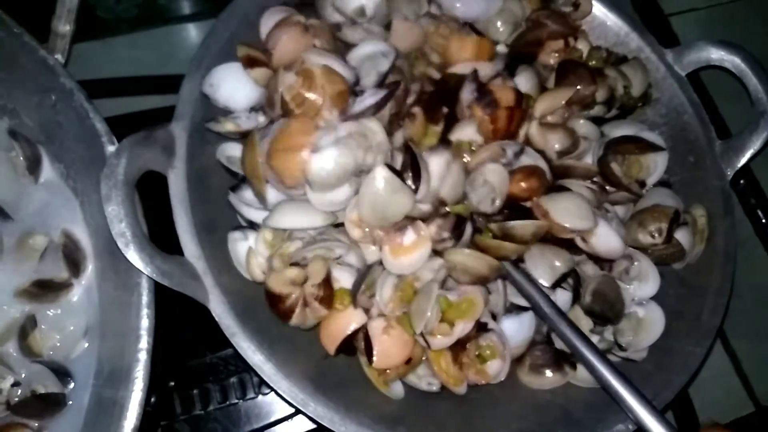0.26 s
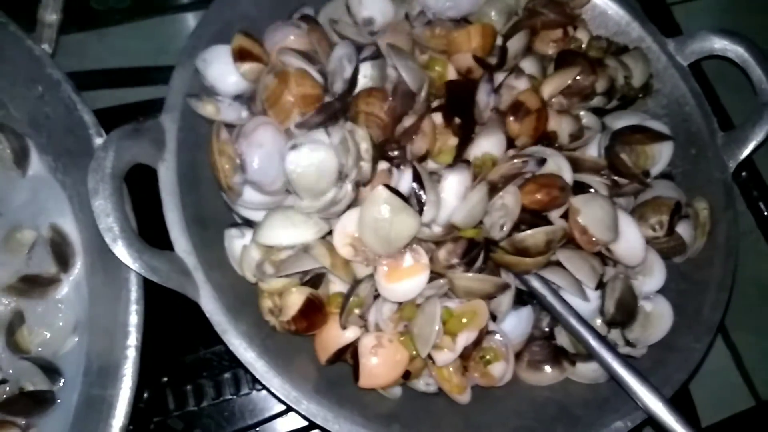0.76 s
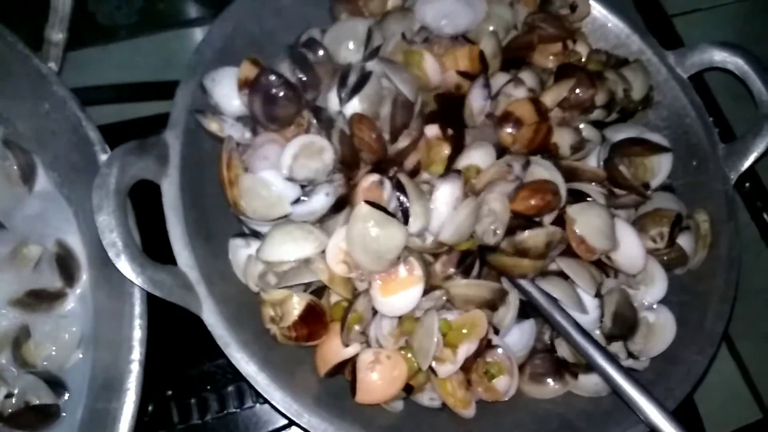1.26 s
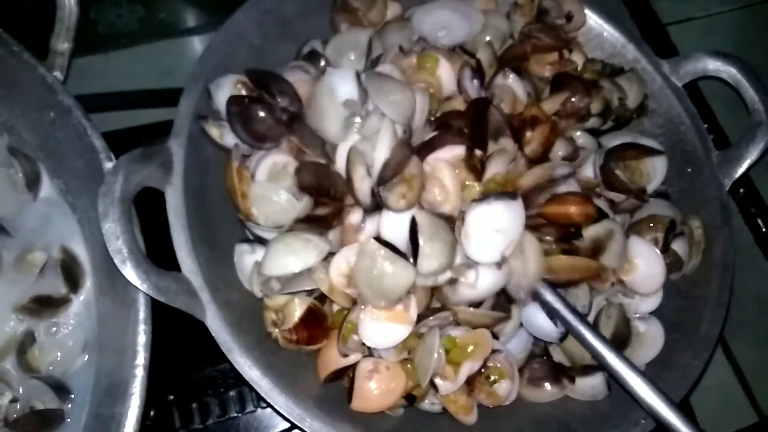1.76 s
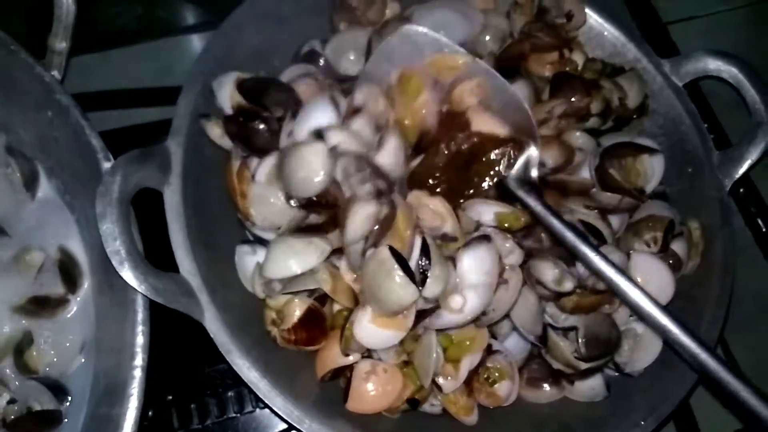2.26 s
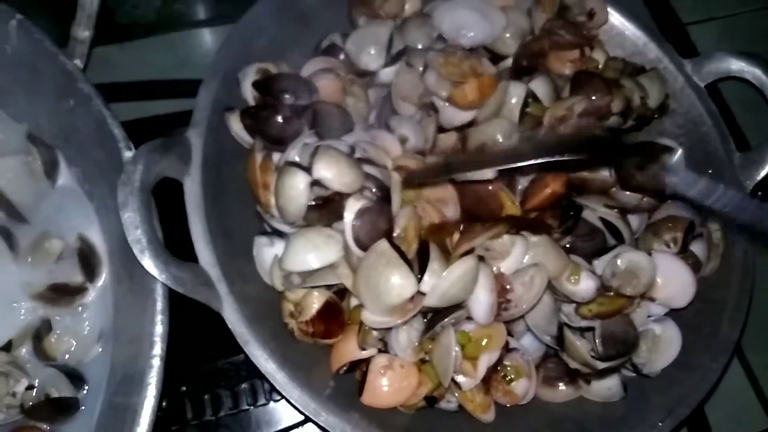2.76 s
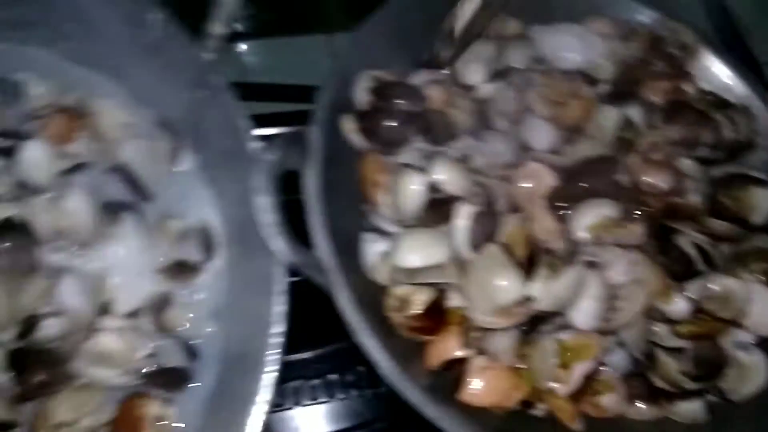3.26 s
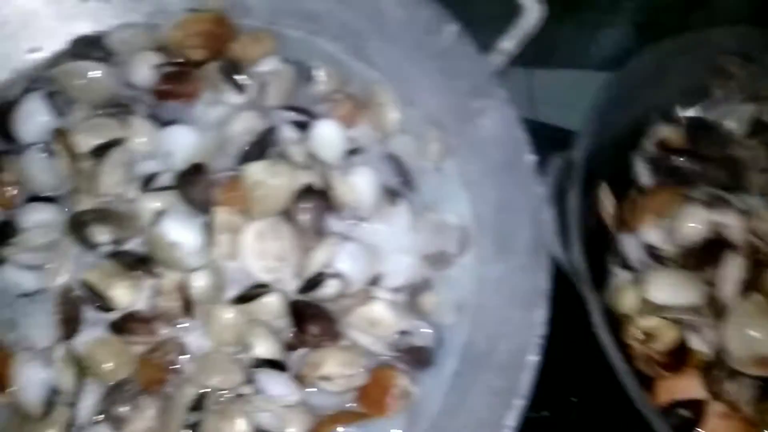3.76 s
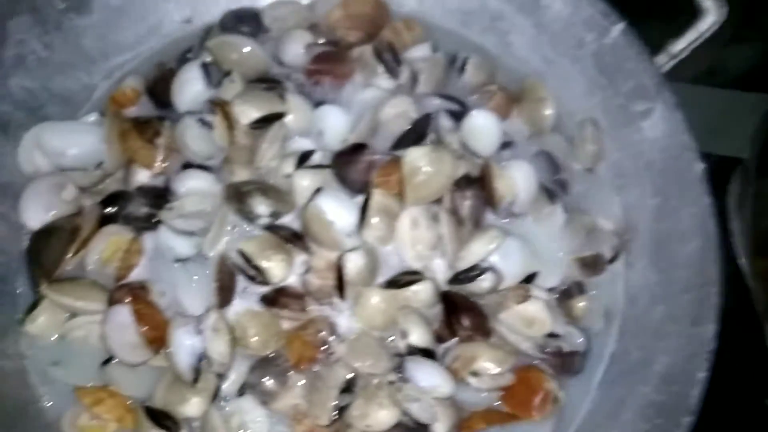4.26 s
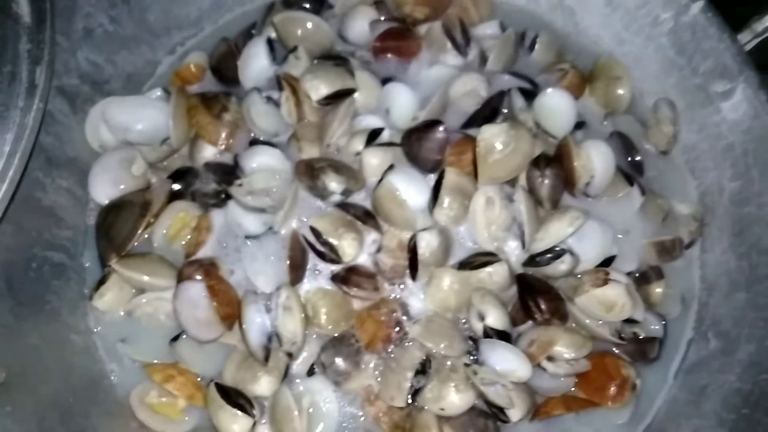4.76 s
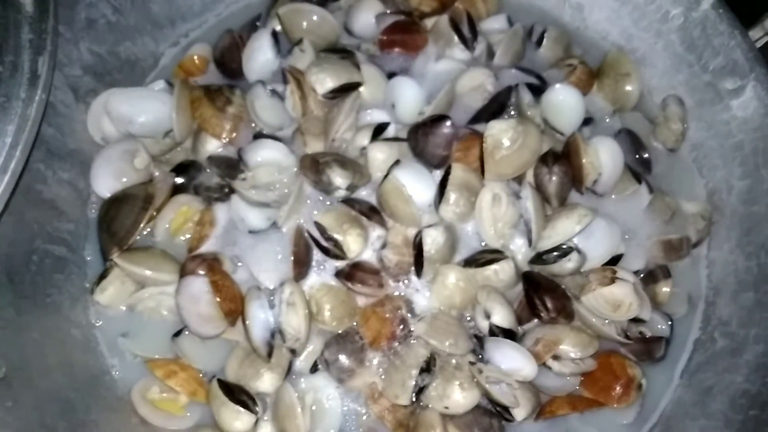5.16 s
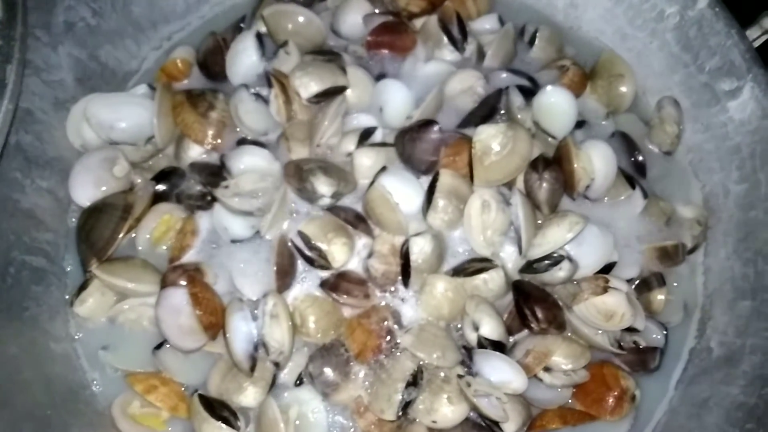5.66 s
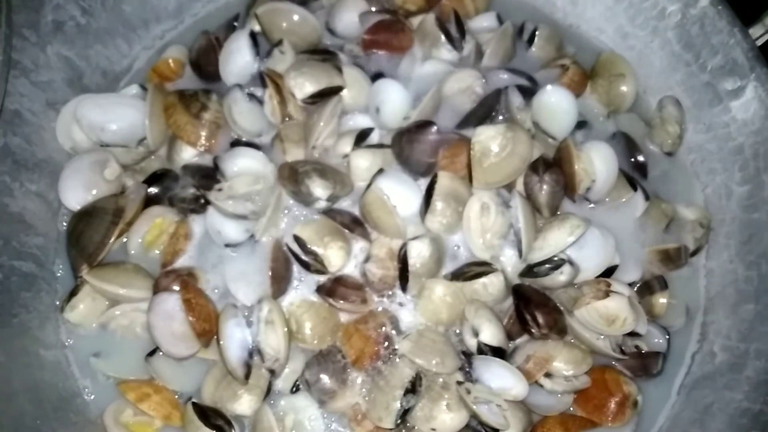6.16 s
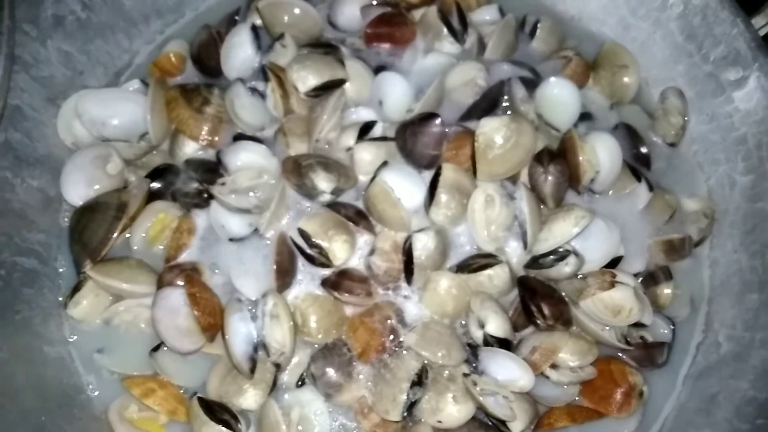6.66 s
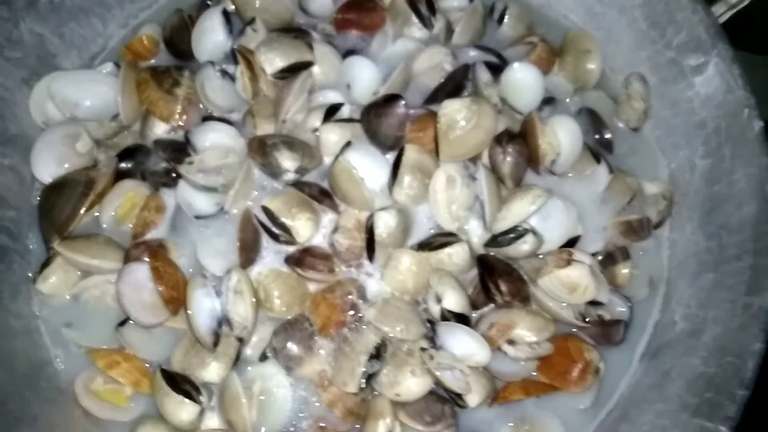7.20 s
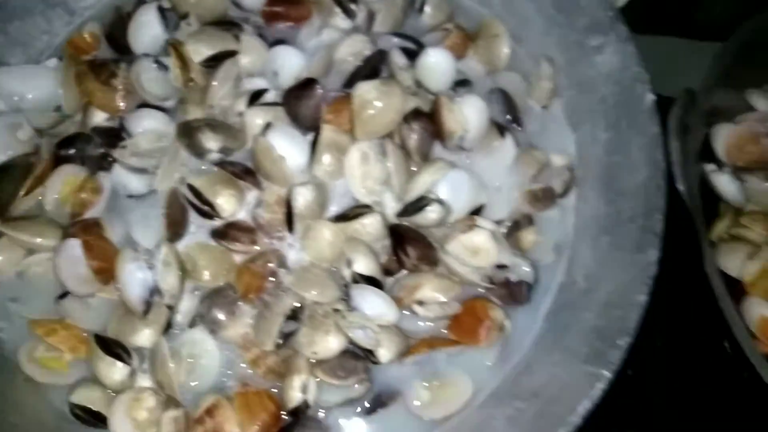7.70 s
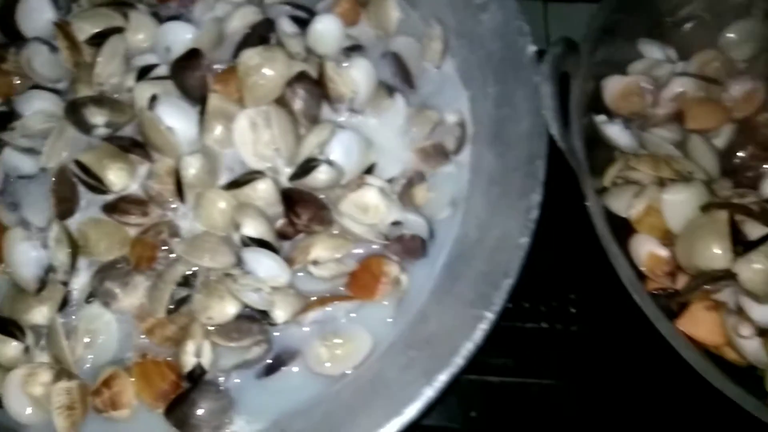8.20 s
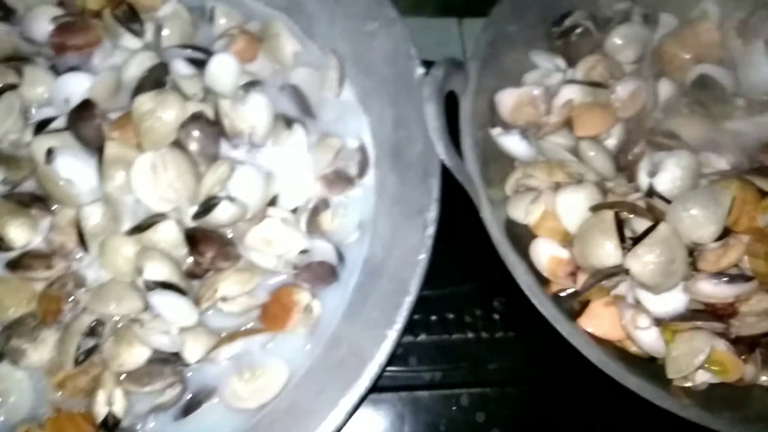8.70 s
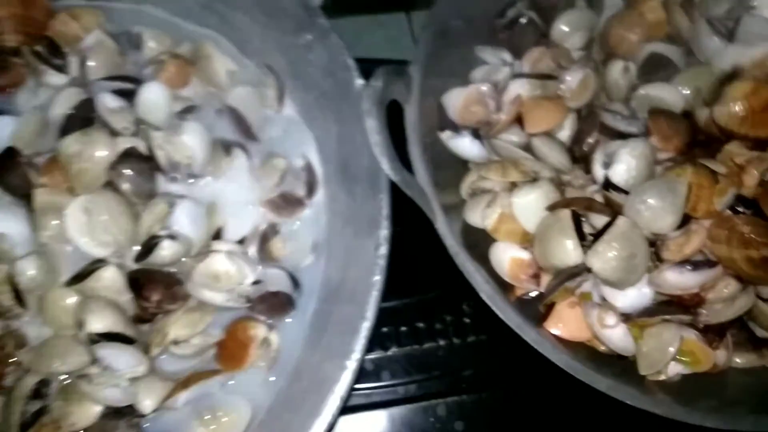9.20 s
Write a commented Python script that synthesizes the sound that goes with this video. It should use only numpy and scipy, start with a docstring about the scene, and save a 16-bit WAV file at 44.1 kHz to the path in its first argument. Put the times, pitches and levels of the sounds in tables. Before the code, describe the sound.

A metal spatula stirs a heap of clams in bare metal pans, shells clattering and grinding over a low burner rumble and bubbling simmer.

```python
"""In a small kitchen, a steel spatula first turns clams in a cast wok: shells clack and grind, the blade scrapes.
From about 4 s it works in a pan of broth beside it, where the broth sloshes between about 5.5 and 7.3 s.
After about 8.3 s it is back in the wok, and near 9 s two faint steady tones fade.
Shells are noise cracks with ringing modes, pans are dying sine waves, and broth is soft noise with bubbles.
Filtered noise and bubbles make the gas burners and simmering pans heard underneath all the way through."""
import sys
import numpy as np
from scipy import signal
from scipy.fft import rfft, irfft, next_fast_len
from scipy.io import wavfile
from scipy.ndimage import uniform_filter1d, map_coordinates

SR = 44100
rng = np.random.default_rng(int(sys.argv[2]) if len(sys.argv) > 2 else 0)


def generate_wav(sig):
    """Save sig (samples, or channels by samples) to the path in sys.argv[1] as 16-bit PCM at SR."""
    pcm = np.round(np.clip(np.atleast_2d(sig).T, -1, 1) * 32767).astype(np.int16)
    wavfile.write(sys.argv[1], SR, pcm)


N = 416304

# Tone of shells moving against each other. Each row: frequency in Hz, relative level in dB.
SHELL_TONE = [(500, -16.5), (1500, -2.5), (2050, -8.5), (2700, -2.5), (3900, -1), (5500, -2.5), (8000, 0),
              (15500, -6.5)]
TICKS_PER_S, TICK_SPREAD_DB = 60, 6  # each tick is up to this much louder or softer
SLIPS_PER_S, SLIP_S = 75, 0.009  # SLIP_S: time for a slip to fade to about a third


def rattle(stir_db, blade_db):
    """The heap shifts: shells tick one by one, and their ridges catch and slip in short rasps."""
    ticks = np.zeros((2, N))
    for slot in np.arange(0, N / SR, 1 / TICKS_PER_S):
        s = slot + 2 * rng.random() / TICKS_PER_S
        add(ticks, s, amp(TICK_SPREAD_DB * rng.uniform(-1, 1)) * any_shell())
    touches = contacts(per_second=1500, size_db=1.0)
    ridges = levelled(scattered(touches, any_shell, size=1024), seconds=0.0093)
    # a slip starts at once and dies away
    slip_starts = np.abs(contacts(SLIPS_PER_S, size_db=2))
    slips = signal.lfilter([1], [1, -np.exp(-1 / (SLIP_S * SR))], slip_starts)
    # in a brisk stroke the slips merge into a continuous grind
    grind = .45 * amp(.5 * (stir_db + 35))
    rasps = unit(ridges * (slips + grind))
    heap = coloured(.5 * unit(ticks) + rasps, SHELL_TONE)
    # shells pressed against the metal sound fuller, loose ones thinner
    body = filtered(heap, lambda hz: hump(hz, 1700, octaves=1.0))
    pressed = heap + body * (amp(blade_db + 24.5) - 1)
    return amp(stir_db + 0.5) * levelled(pressed, seconds=0.083)


# Pushes of the spatula through the heap. Each row: start in seconds, length in seconds,
# basic rattle level in dB, swell from start to end in dB, scrape offset in dB.
STROKES = [(0.074, 0.44, -43, -3, -22), (0.905, 0.13, -43, 8.5, -24), (1.16, 0.44, -44.5, -8.5, -19.5),
           (1.888, 0.09, -35, 2, -27.5), (2.045, 0.091, -38.5, 8.5, -17.5), (2.215, 0.11, -33, -6.5, -23),
           (2.383, 0.27, -47, -14, -22), (2.861, 0.04, -36.5, 7, -24.5), (3.497, 0.18, -37, 11.5, -20),
           (3.739, 0.05, -27, 4.5, -21), (3.923, 0.3, -45.5, 16.5, -19.5), (4.266, 0.67, -32.5, 2.5, -28),
           (5.705, 0.061, -27.5, 6.5, -21.5), (5.801, 0.31, -36.5, -6, -19.5),
           (6.013, 0.068, -28.5, -4.5, -22.5), (6.366, 0.18, -46.5, -14, -29),
           (6.848, 0.29, -35, 13.5, -23), (7.465, 0.3, -37, 10, -23), (7.833, 0.25, -34.5, -8, -20),
           (8.206, 0.24, -45, -1.5, -21.5), (8.431, 0.3, -33.5, -6.5, -29)]
SETTLE_DB_PER_S = 234  # the heap settles after the push
CREEP_DB, CREEP_SCRAPE_DB = -56.5, -24.5  # between pushes a few shells still slide


def effort():
    """Rattle level and scrape offset in dB per sample: the strongest push leads, over the heap's creep."""
    t = np.arange(0, N / SR, .002)
    gains = [push(t, start, length, db, swell_db, SETTLE_DB_PER_S)
             for start, length, db, swell_db, _ in STROKES]
    power = np.array(gains + [np.full(len(t), amp(CREEP_DB))]) ** 2
    offsets_db = np.array([row[-1] for row in STROKES] + [CREEP_SCRAPE_DB])
    total = power.sum(axis=0)
    return curves(np.column_stack([t, 10 * np.log10(total), offsets_db @ power / total]))


ATTACK_S = 0.015  # a push gets going quickly


def push(t, start, length, db, swell_db, settle_db_per_s):
    """Gain of one push: a quick rise, a hold that swells or slackens, and a steady fall."""
    progress = np.clip((t - start) / length, 0, 1)
    fall_db = settle_db_per_s * np.maximum(t - start - length, 0)
    rise = np.clip((t - start) / ATTACK_S, 0, 1)
    return rise * amp(db + swell_db * (progress - .5) - fall_db)


# Single shells striking. Each row: time in seconds, relative level in dB, shell pitch in Hz.
CLACKS = [(0.0617, -24.5, 8440), (1.133, -16.5, 6570), (1.381, -19.5, 9030), (1.4718, -22.5, 5920),
          (1.814, -23.5, 4550), (1.904, -21, 7020), (2.053, -21, 6300), (2.0871, -19.5, 7460),
          (2.1928, -17, 5870), (2.324, -24.5, 5940), (2.434, -21, 5940), (2.5052, -21, 7050),
          (2.5475, -24, 6800), (2.5776, -23, 9200), (2.665, -28, 9300), (2.7009, -18, 5890),
          (3.5063, -22.5, 7840), (3.574, -23, 6300), (3.667, -16.5, 4440), (3.7427, -16, 4620),
          (4.325, -18, 8300), (4.3725, -29, 11500), (4.4027, -21, 7340), (4.436, -30, 4000),
          (4.4625, -16, 3880), (4.525, -16, 11900), (4.6874, -18.5, 9000), (4.7498, -22, 8050),
          (4.931, -21, 8200), (5.0517, -17, 7950), (5.12, -30, 7300), (5.221, -26, 6160),
          (5.288, -29.5, 5300), (5.5645, -15.5, 10000), (5.672, -20.5, 4130), (6.1069, -19.5, 3640),
          (6.433, -21, 2560), (6.4815, -16.5, 4470), (6.982, -22, 3770), (7.122, -18, 9050),
          (7.1491, -16.5, 3800), (7.172, -17.5, 8500), (7.275, -23.5, 6160), (7.341, -18, 4550),
          (7.3477, -22, 3940), (7.359, -19, 4670), (7.4625, -19, 7160), (7.474, -18, 4550),
          (7.6068, -10.5, 9230), (7.7542, -18, 4030), (7.8854, -17.5, 7860), (8.031, -16.5, 7570),
          (8.071, -19.5, 7000), (8.63, -28, 2980), (8.8896, -23, 6850), (8.97, -25.5, 4570),
          (9.028, -29, 7700), (9.034, -18, 3920), (9.1013, -18, 4290)]


def clacks():
    """Single shells fall or snap past the blade, each with its own pitch."""
    out = np.zeros((2, N))
    for s, db, pitch_hz in CLACKS:
        add(out, s, amp(db - 0.5) * shell_click(pitch_hz))
    return filtered(out, lambda hz: amp(along(SHELL_TONE, hz)))


SHELL_CYCLES = 115  # swings of the main mode while it fades by 60 dB
SHELL_RING_DB = -3.5


def shell_click(pitch_hz):
    """A struck shell: a crack, ringing modes, the bowl's short answer and a rebound; low shells last longer."""
    t, t60 = np.arange(SR // 25) / SR, SHELL_CYCLES / pitch_hz
    others = np.minimum(pitch_hz * np.exp(.3 * rng.standard_normal(size=4)), TOP_HZ)
    ring = pan_ring([(pitch_hz, 0, t60)] + [(hz, -6, t60) for hz in others], t)
    # the crack fades with the shell, then gives way to the bowl's longer answer
    crack_gain = np.maximum(amp(-60 * t / t60), amp(-9 - 60 * t / .06))
    crack = rng.standard_normal((2, len(t))) * crack_gain
    click = crack + amp(SHELL_RING_DB) * ring
    rebound_s = rng.uniform(.002, .009)
    add(click, rebound_s, .55 * click)
    return click


SHELL_HZ = 6980  # pitch of a typical shell


def any_shell():
    """The click of a shell of random size, and so of random pitch."""
    return shell_click(SHELL_HZ * np.exp(.6 * rng.uniform(-1, 1)))


# Tone of metal being scraped or knocked. Each row: frequency in Hz, relative level in dB.
METAL_TONE = [(200, -15), (450, -4), (700, 3), (1600, 1.5), (2100, 4), (8000, -8)]
# Ringing of the wok. Each row: frequency in Hz, relative level in dB, time to fade by 60 dB in seconds.
WOK = [(542, -4.5, 0.098), (707, -1.5, 0.14), (1694, 4.5, 0.054)]
# Ringing of the broth pan. Each row: frequency in Hz, relative level in dB, time to fade by 60 dB in seconds.
BROTH_PAN = [(665, 1.4, 0.059), (881, 3.2, 0.068), (1530, 4.3, 0.095)]


def scrape(stir_db, blade_db):
    """The blade drags shells over the metal in tiny slips, which set the pan ringing."""
    t = np.arange(SR // 4) / SR
    touches = contacts(per_second=400, size_db=3.0)
    slips = scattered(touches, lambda: bowl(t60=0.016, direct_db=-13.0), size=2048)
    dull = coloured(slips, METAL_TONE)
    wok, broth_pan = (unit(signal.fftconvolve(dull, pan_ring(modes, t), axes=1)[:, :N])
                      for modes in (WOK, BROTH_PAN))
    ring = np.where(in_broth_pan(np.arange(N) / SR), broth_pan, wok)
    # stronger stirring adds less scrape than rattle
    gain = amp(0.51 * stir_db + blade_db - 3.5)
    return gain * levelled(dull + amp(-8.5) * ring, seconds=0.08)


def bowl(t60, direct_db):
    """A direct click and its dense reflections among the shells and pan walls."""
    t = np.arange(SR // 16) / SR
    fade = amp(-60 * t / t60) + amp(direct_db - 60 * t / 0.012)
    echo = rng.standard_normal((2, len(t))) * fade
    return echo / np.linalg.norm(echo[0])


def pan_ring(modes, t):
    """Ringing modes as dying sine waves at new strengths, as heard from two places."""
    hz, db, t60 = np.transpose(modes)[:, :, None]
    strength = amp(db + 2 * rng.standard_normal((2, len(modes), 1)) - 60 * t / t60)
    turns = hz * t + rng.random((2, len(modes), 1))
    return np.sum(strength * np.sin(2 * np.pi * turns), axis=1)


BROTH_PAN_FROM_S, BROTH_PAN_TO_S = 4.0, 8.3


def in_broth_pan(s):
    """Whether the spatula is in the broth pan, so that this pan rings rather than the wok."""
    return (s > BROTH_PAN_FROM_S) & (s < BROTH_PAN_TO_S)


# The blade knocking on a pan. Each row: time in seconds, relative level in dB, most excited pitch in Hz.
KNOCKS = [(0.245, -33.5, 1050), (1.131, -31, 1250), (1.694, -34, 780), (1.815, -33.5, 1310),
          (1.964, -23, 580), (2.052, -26.5, 820), (2.7, -33.5, 523), (2.901, -29.5, 1710),
          (5.566, -28, 885), (6.048, -26.5, 945), (6.433, -29.5, 840), (8.599, -32, 730), (8.63, -28, 1800),
          (8.971, -34, 1540), (9.029, -27, 844)]
# The blade's own ring. Each row: frequency in Hz, relative level in dB, time to fade by 60 dB in seconds.
BLADE = [(2480, 1, 0.11), (3060, -7, 0.16)]


def knocks():
    """The blade meets the pan: a thud damped by clams, the blade's ring, and modes set by the spot struck."""
    out, t = np.zeros((2, N)), np.arange(SR // 4) / SR
    for s, db, pitch_hz in KNOCKS:
        pan = BROTH_PAN if in_broth_pan(s) else WOK
        # modes near the excited pitch ring louder
        modes = [(hz, level + 12 * hump(hz, pitch_hz, octaves=.12), t60) for hz, level, t60 in pan + BLADE]
        body = lambda hz: amp(along(METAL_TONE, hz) + 7.9 * hump(hz, pitch_hz, octaves=0.39))
        noise = rng.standard_normal((2, len(t)))
        thud = unit(filtered(noise, body)) * amp(-60 * t / 0.055)
        add(out, s, amp(db) * (thud + amp(-12) * pan_ring(modes, t)))
    return out


# Surges of broth pushed by the blade. Each row: start in seconds, length in seconds,
# churn level in dB, swell from start to end in dB, typical bubble pitch in Hz.
SURGES = [(5.552, 0.49, -61, -3, 377), (5.969, 0.21, -49.5, -9, 343), (6.757, 0.05, -43, -17, 423),
          (6.907, 0.27, -50.5, 0, 500)]
BROTH_SETTLE_DB_PER_S = 92


def slosh():
    """Broth slaps into the hollows that the blade leaves: a low churn with bubbles in it."""
    out, t = np.zeros((2, N)), np.arange(SR) / SR
    for start, length, db, swell_db, pitch_hz in SURGES:
        times = start + np.cumsum(rng.exponential(1 / 250, size=110))
        gain = push(times, start, length, db, swell_db, BROTH_SETTLE_DB_PER_S)
        out += bubbles(times, 20 * np.log10(gain + 1e-9) + 2, pitch_hz=pitch_hz, cycles=2.0)
        tone = lambda hz: hump(hz, pitch_hz, octaves=0.53) + hump(hz, 2 * pitch_hz, octaves=1.0) / 2
        churn = unit(filtered(rng.standard_normal((2, SR)), tone))
        add(out, start, churn * push(t, 0, length, db, swell_db, BROTH_SETTLE_DB_PER_S))
    return out


def bubbles(times, levels_db, pitch_hz, cycles):
    """Bubbles of scattered size: short rings that rise a little in pitch."""
    out, t = np.zeros((2, N)), np.arange(SR // 20) / SR
    for s, db in zip(times, levels_db):
        turns = pitch_hz * np.exp(0.266 * rng.standard_normal()) * t * (1 + 2 * t)
        ring = np.sin(2 * np.pi * turns) * np.exp(-turns / cycles) * (1 - np.exp(-2 * turns))
        add(out, s, amp(db) * rng.standard_normal((2, 1)) * ring)
    return out


# Two faint tones. Each row: time in seconds, level in dB, pitch in Hz.
FAINT_TONES = [(8.972, -39, 668), (9.034, -38, 1540)]
TONE_T60_S = 0.3  # time to fade by 60 dB


def faint_tones():
    """Two faint pure tones, one low and one higher, each starting at once and fading."""
    out, t = np.zeros((2, N)), np.arange(SR // 2) / SR
    for s, db, pitch_hz in FAINT_TONES:
        add(out, s, amp(db - 60 * t / TONE_T60_S) * np.sin(2 * np.pi * pitch_hz * t))
    return out


# Tone of the gas flames. Each row: frequency in Hz, relative level in dB.
BURNERS = [(25, -40), (50, -13.5), (68, -2), (80, -20), (98, 1.5), (135, -4.5), (210, -8), (270, -15),
           (1800, -28.5)]
# Tone of the simmering hiss. Each row: frequency in Hz, relative level in dB.
SIMMER = [(300, -106), (530, 7.5), (610, -11), (705, 9), (810, -39), (1150, -1), (2000, -24), (8500, -18),
          (12000, -6.5)]


def stove():
    """Gas flames rumble; the simmering hisses and bubbles densely in the hollow of the pans."""
    flames = amp(-52.0) * coloured(rng.standard_normal((2, N)), BURNERS)
    hiss = amp(-54.0) * coloured(rng.standard_normal((2, N)), SIMMER)
    times = rng.uniform(0, N / SR, size=1000)
    blips = bubbles(times, np.full(len(times), -45), pitch_hz=920, cycles=3)
    return flames + hiss + blips


# How long the room echoes. Each row: frequency in Hz, time to fade by 60 dB in seconds.
KITCHEN = [(6000, 0.47), (15000, 0.031)]


def kitchen_tail():
    """The walls answer after a 5 ms gap with fading noise, its treble dying first."""
    hz, t, z = signal.stft(rng.standard_normal((2, SR // 3)), SR, nperseg=256)
    fade = amp(-60 * t / along(KITCHEN, hz)[:, None])
    tail = signal.istft(z * fade, SR, nperseg=256)[1]
    return np.pad(tail / np.linalg.norm(tail[0]), ((0, 0), (SR // 200, 0)))


# How alike left and right are. Each row: frequency in Hz, likeness (1 is the same, 0 is unrelated).
ALIKE = [(150, 0.99), (350, 0.87), (1100, 0.69), (2500, 0.012)]


def spread(pair):
    """Two unrelated signals become left and right: alike in the bass, unrelated in the treble."""
    turn = lambda hz: np.arccos(np.clip(along(ALIKE, hz), -1, 1)) / 2
    mid, side = filtered(pair, lambda hz: np.array([np.cos(turn(hz)), np.sin(turn(hz))]))
    return np.array([mid + side, mid - side])


def contacts(per_second, size_db):
    """Instant touches at random times, mostly faint and a few strong."""
    chance, luck, side = rng.random((3, N))
    strength = amp(size_db * np.minimum(-np.log(luck), 4))
    return (chance < per_second / SR) * np.sign(side - .5) * strength


def scattered(x, tail, size):
    """Convolve with an echo pattern that is drawn anew as things move."""
    out = np.zeros((2, N))
    for i in range(0, N, size):
        block = np.atleast_2d(x[..., i:i + size])
        add(out, i / SR, signal.fftconvolve(block, tail(), axes=1))
    return out


def levelled(x, seconds):
    """Even out the slow level of a grain stream and keep its fast grain."""
    power = uniform_filter1d(np.mean(x ** 2, axis=0), int(seconds * SR) + 1)
    return x / np.sqrt(np.abs(power) + 0.0058 * power.mean())


def amp(db):
    """Decibels to gain."""
    return 10 ** (np.asarray(db) / 20)


def unit(x):
    """Scale to an average (rms) level of 1."""
    return x / np.sqrt(np.mean(x ** 2) + 1e-20)


def along(points, hz):
    """Read a value between (Hz, value) points on a log-frequency axis."""
    f, v = np.transpose(points)
    return np.interp(np.log(hz + 1), np.log(f + 1), v)


def curves(rows):
    """One value per sample for each column after the time."""
    s, *cols = np.transpose(rows)
    return [np.interp(np.arange(N) / SR, s, c) for c in cols]


def add(track, s, sound):
    """Mix a sound in at s seconds."""
    part = track[..., max(round(s * SR), 0):][..., :sound.shape[-1]]
    part += sound[..., :part.shape[-1]]


def filtered(x, response):
    """Weigh each frequency of x by a response."""
    size = x.shape[-1]
    m = next_fast_len(size + 4096)
    return irfft(rfft(x, m) * response(np.fft.rfftfreq(m, 1 / SR)), m)[..., :size]


def coloured(x, spectrum):
    """Filter x by (Hz, dB) points, then scale it to rms 1."""
    return unit(filtered(x, lambda hz: amp(along(spectrum, hz))))


def hump(hz, centre_hz, octaves):
    """A bell on the log-frequency axis, 1 at its centre."""
    return np.exp(-.5 * (np.log2((hz + 1) / centre_hz) / octaves) ** 2)


# The microphone moves between the pans. Each row: time in seconds, position (0 over the wok, 1 over the broth pan).
NEAR = [(2.6, 0.2), (4.2, 0.94), (7.8, 0.92), (9.2, 0.12)]
LAG_S = 0.000323  # right over the broth pan, the stirring reaches the left port this much later


def scene():
    """Stirring and its echo over the stove; the broth pan is closer, so brighter, and lies further right."""
    near, = curves(NEAR)
    stir_db, blade_db = effort()
    stirring = rattle(stir_db, blade_db) + scrape(stir_db, blade_db)
    stirring = stirring + clacks() + knocks() + slosh() + faint_tones()
    echo = amp(-12) * scattered(stirring, kitchen_tail, size=4096)
    left, right = spread(stirring + echo)
    left = map_coordinates(left, [np.arange(N) - LAG_S * SR * near], order=5)
    balance = amp(np.outer([.5, -.5], 1.2 - 2.4 * near))
    sound = np.array([left, right]) * balance + spread(stove())
    treble = filtered(sound, lambda hz: hump(hz, 16200, octaves=0.28))
    return sound + treble * (amp(2.0 * near - 7.0) - 1)


# The left microphone port is the duller one. Each row: frequency in Hz, left minus right in dB.
PORTS = [(250, 0), (1400, -4.5), (2200, 1.5), (4500, -1), (8000, -2.5), (10500, -8), (13000, -13.5)]
TOP_HZ = 15700  # nothing is heard above this


def record(dry):
    """Two unequally bright microphone ports and a steep band limit."""
    return filtered(dry, lambda hz: amp(np.outer([.5, -.5], along(PORTS, hz))) * (hz < TOP_HZ))


dry = scene()
out = record(dry)
generate_wav(out)
```